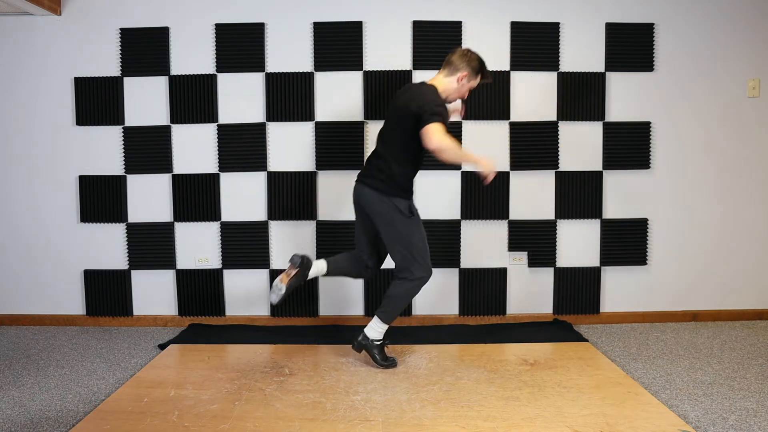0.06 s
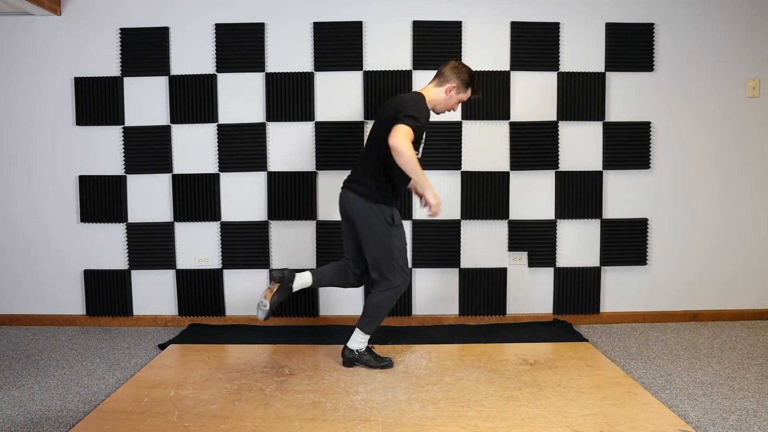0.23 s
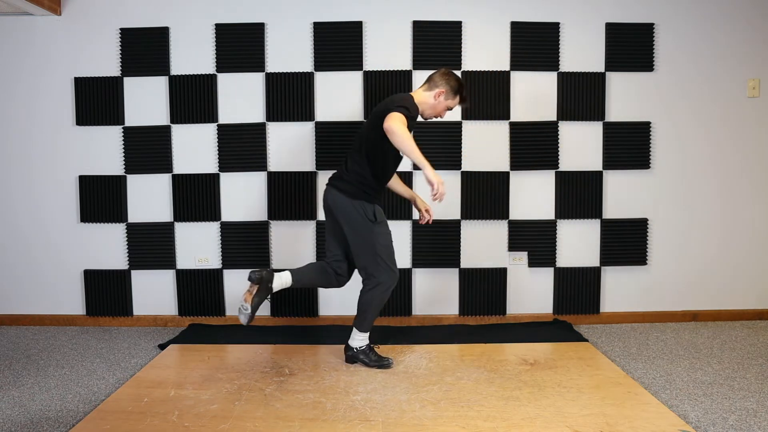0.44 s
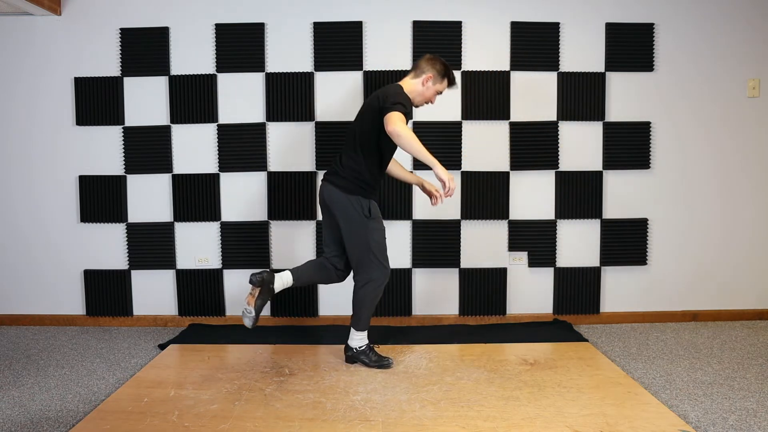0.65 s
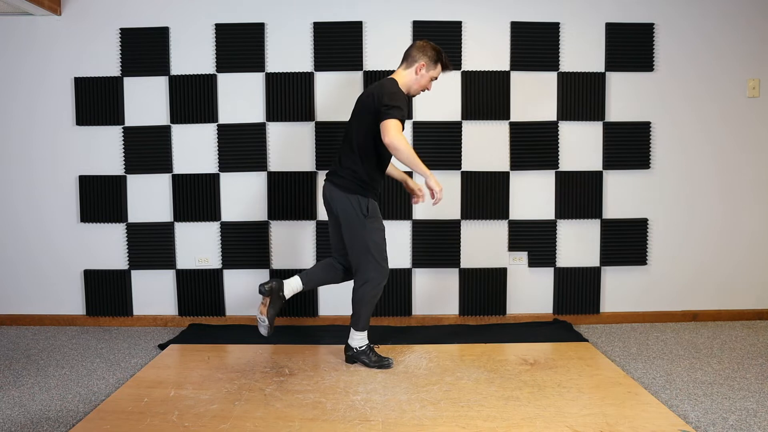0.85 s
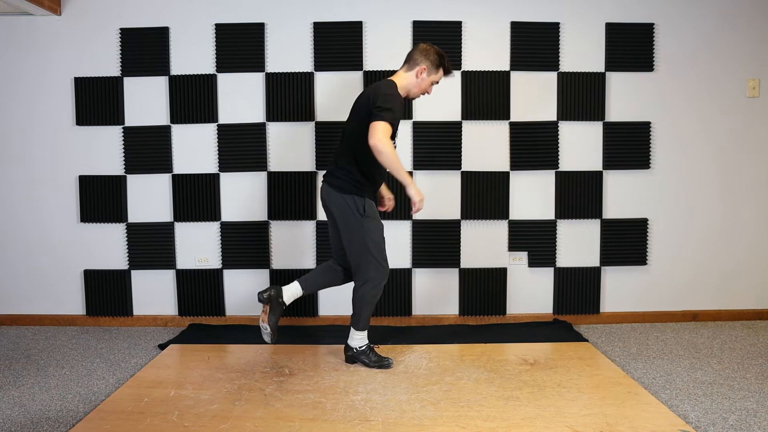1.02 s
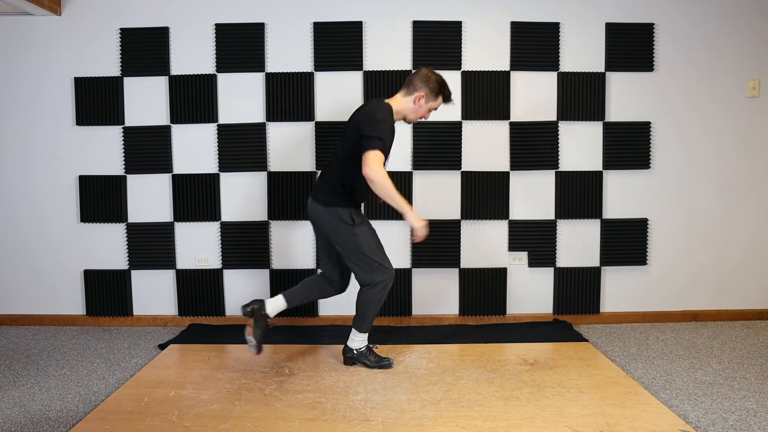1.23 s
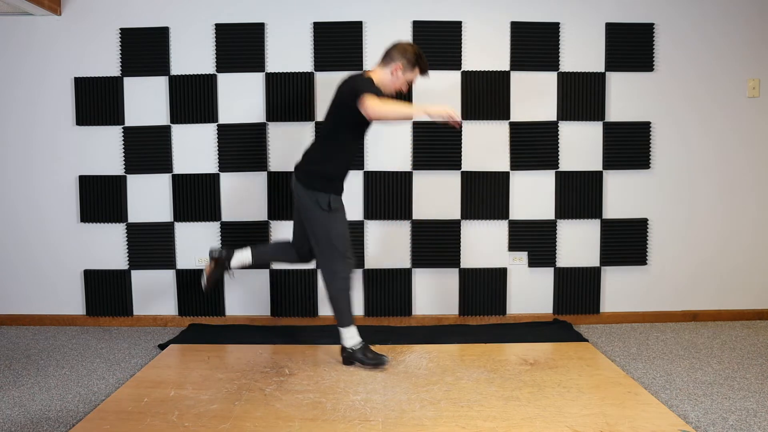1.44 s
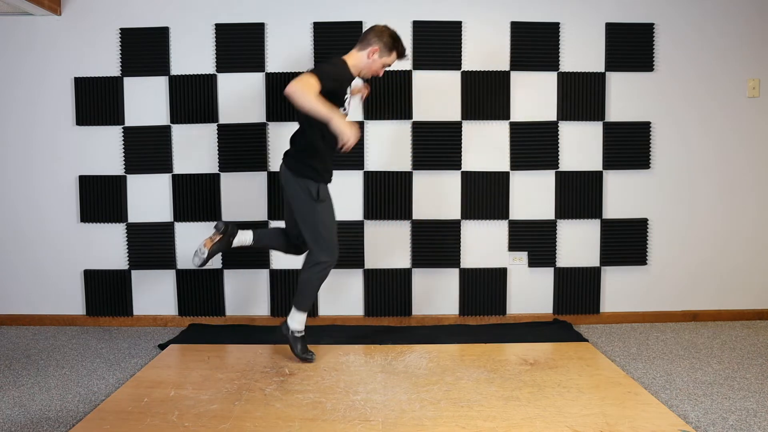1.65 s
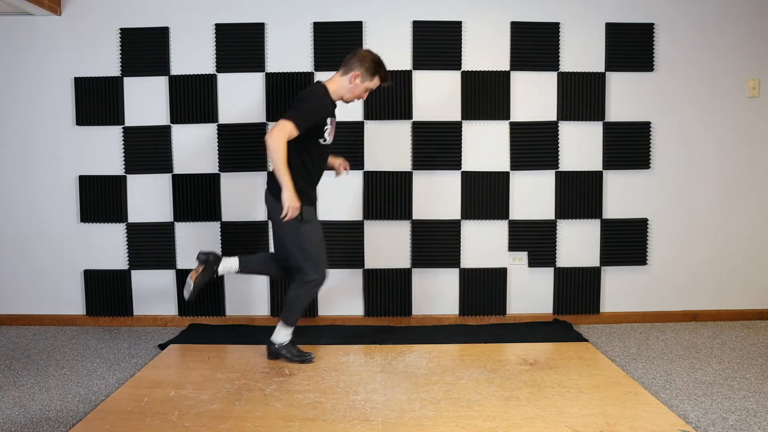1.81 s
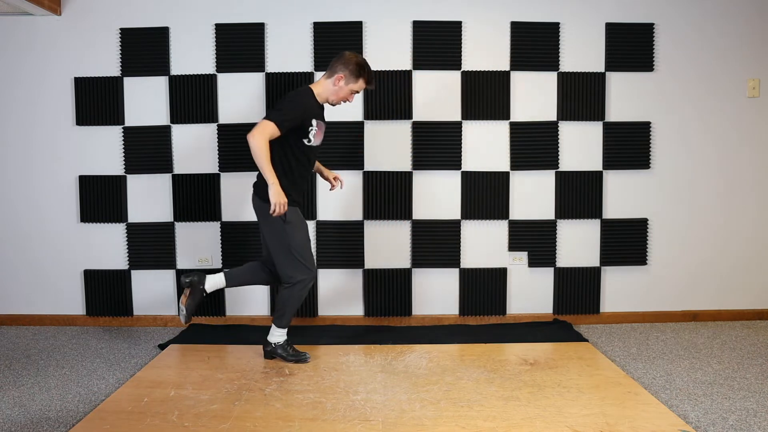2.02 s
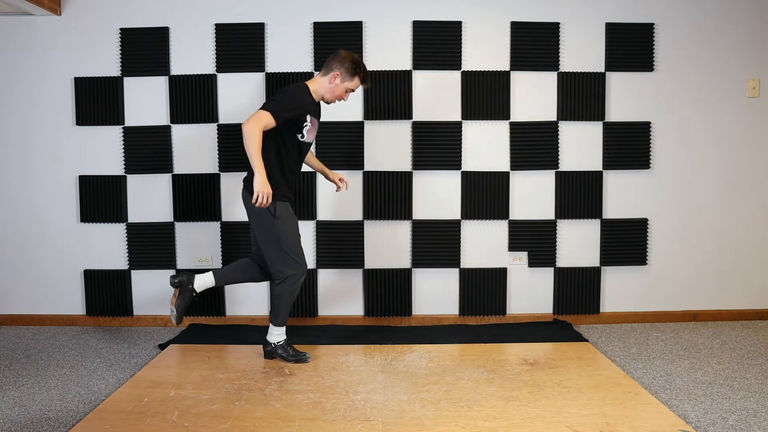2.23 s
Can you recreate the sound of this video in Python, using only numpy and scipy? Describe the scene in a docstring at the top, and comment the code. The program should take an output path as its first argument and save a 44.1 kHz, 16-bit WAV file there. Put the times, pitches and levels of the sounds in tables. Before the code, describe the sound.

Hard dance shoe taps on a wooden floor panel: two, a pause, then three quick ones

```python
"""A small room with a wooden floor panel: hard dance shoes strike two taps, pause, then three quick taps.
In the pause come light clicks, a faint swivel of the sole, a rustle of trouser legs and soft steps.
Noise bursts make the cracks and knocks, damped modes the ring of the shoe tip and the boom of the panel.
Rubbing is a dense train of random slips; wall echoes and diffuse tails make the room, over a low room tone.
The loudest attacks overload the microphone."""
import sys
import numpy as np
from scipy import signal
from scipy.fft import rfft, irfft, next_fast_len
from scipy.io import wavfile
from scipy.ndimage import uniform_filter1d

SR = 44100
rng = np.random.default_rng(int(sys.argv[2]) if len(sys.argv) > 2 else 0)


def wrap_up_sound(samples):
    """Save the sound to the file named by the first command line argument, as 16-bit audio."""
    columns = np.atleast_2d(samples).T
    # keep every value between -1 and 1, then stretch to whole-number steps
    tamed = np.clip(columns, -1, 1)
    steps = np.round(tamed * 32767).astype(np.int16)
    wavfile.write(sys.argv[1], SR, steps)


N = 100503  # samples in the scene

# Levels in the tables are relative; the gains of the layers add to them.
# Steady hush of the room, spectrum [f/Hz, level/dB]
ROOM_TONE_SPECTRUM = [(20, -21), (55, -15), (95, -3), (125, 5), (170, -8.5), (260, -11.5), (450, -22.5),
                      (1000, -26), (3000, -32.5), (7000, -37.5), (11000, -42), (15000, -61)]
# Hard taps [t/s, level/dB, tip pitch favoured by the contact spot f/Hz, crack level/dB, edge level/dB,
# panel boom level/dB, favoured panel pitch f/Hz, wall echo level/dB, room level/dB]
TAP_EVENTS = [(-.005, -5, 1476, 1.5, 1.5, -6.5, 208.3, 0.5, 1.5),
              (0.2228, 5.5, 1440, -4, 0.5, -2.5, 157.7, -1, -3),
              (1.549, 2, 1296, 0, 3.5, -13.5, 200, -7.5, -1.5),
              (1.699, 1.5, 1870, -3, 4, -14, 200, -1.5, -3),
              (1.8748, 6.5, 1312, -6, -1, -11.5, 136, 1, -4.5)]
# First hard contact, spectrum [f/Hz, level/dB]
TICK_SPECTRUM = [(500, -24), (2500, 0), (4500, 8), (6500, -23), (10000, -10.5), (15000, -17.5)]
# Crack of the impact, spectrum [f/Hz, level/dB] and decay [f/Hz, t60/s]
CRACK_SPECTRUM = [(30, -33), (150, -7.5), (400, -4.5), (750, -8), (1400, 10), (2000, 6.5), (3200, -0.5),
                  (5000, -16), (8000, -25.5), (15000, -43)]
CRACK_DECAY = [(100, 0.082), (1500, 0.01), (5000, 0.041), (14000, 0.011)]
# Modes of the shoe tip on wood, then of the floor panel [f/Hz, level/dB, t60/s]
TIP_MODES = [(952, -16.5, 0.04), (1009.7, -17.5, .05), (1326, -4, 0.026), (1482, -9.5, 0.0093),
             (1556, -3.5, 0.033), (1818, -6, .028), (2030, -10, 0.044), (2685, -9, .016), (3320, -12, .015),
             (4680, -19.5, 0.011)]
PANEL_MODES = [(68, -26, .15), (97.5, -26, 0.33), (138.4, -8.5, 0.24), (156, -23, 0.25),
               (203.2, -17.5, 0.42), (235, -22.5, 0.37), (313, -21, 0.2), (448, -20.5, 0.32)]
# Change of treble when the tip lands on its edge [f/Hz, share of the edge level in dB]
EDGE_TILT = [(1800, 0), (3000, -0.57), (4600, 1.5), (7000, 0.36), (14000, .3)]
# Early reflections from near walls [delay t/s, level/dB]
WALL_ECHOES = [(.0031, -11.5), (.0052, -20.5), (.0087, -11.5)]
# Reverberation of the room: decay [f/Hz, t60/s] and colour [f/Hz, level/dB]
ROOM_DECAY = [(100, 0.28), (250, 0.82), (600, 0.43), (1400, 0.47), (3100, 0.5), (5000, 0.52), (7000, 0.42),
              (12000, 0.15)]
ROOM_SPECTRUM = [(40, -7), (150, 1), (600, 3), (1400, 0.5), (2100, -3), (3100, 0), (4200, -5.5), (6000, -4),
                 (14000, -9)]
# Light clicks of the shoe [t/s, level/dB] and their spectrum [f/Hz, level/dB]
CLICK_EVENTS = [(0.886, -55.5), (1.073, -53), (1.484, -54.5)]
CLICK_SPECTRUM = [(200, -5.5), (1200, 8), (2500, -8), (5000, 1.5), (7500, -14.5), (11500, -2.5),
                  (15000, -18.5)]
# Rustle of the trouser legs, envelope [t/s, level/dB] and spectrum [f/Hz, level/dB]
RUSTLE_ENVELOPE = [(1.0, -107), (1.1, -73), (1.25, -72.5), (1.33, -66.5), (1.42, -66.5), (1.5, -61.5),
                   (1.6, -87.5)]
CLOTH_SPECTRUM = [(300, -13), (1300, 0.5), (2500, -4), (4200, -5), (7000, -11.5), (12000, -17),
                  (15000, -36.5)]
# The sole turning on the wood, envelope [t/s, level/dB] and spectrum [f/Hz, level/dB]
SWIVEL_ENVELOPE = [(1.02, -89), (1.065, -67.5), (1.085, -57.5), (1.125, -49.5), (1.18, -52.5),
                   (1.22, -63.5), (1.29, -87.5), (1.4, -96)]
SOLE_SPECTRUM = [(100, -15), (700, -13), (1150, -6), (1600, 0), (2100, -7), (2700, -17), (5000, -25),
                 (8000, -40), (14000, -33.5)]
# Soft footfalls [t/s, sole knock level/dB, panel boom level/dB, tip ring level/dB]
STEP_EVENTS = [(1.199, -48, -38.5, -49), (1.319, -36.5, -30, -37.5), (1.366, -20.5, -18.5, -40.5),
               (1.46, -41, -48.5, -37.5), (1.512, -34.5, -26, -25)]
# Knock of the sole, spectrum [f/Hz, level/dB] and decay [f/Hz, t60/s]
KNOCK_SPECTRUM = [(40, -18), (200, 12.5), (450, -9), (850, -7.5), (1600, -8), (2600, -20), (5000, -22),
                  (8000, -41.5), (12000, -38), (15000, -53.5)]
KNOCK_DECAY = [(100, 0.033), (1500, 0.049), (12000, 0.031)]

# Attack and rise times are time constants of an exponential approach.
ROOM_TONE_DB = -62
TICK_DB, TICK_T60_S, TICK_ATTACK_S = -23.5, 0.0044, 0.0001
CRACK_DB, CRACK_ATTACK_S = -7.5, 0.00026
RING_DB, RING_ATTACK_S = -7.5, 0.00046
BOOM_DB, BOOM_RISE_S = -14.5, 0.012
SPOT_DB, SPOT_OCTAVES = 7, 0.16  # lift and width of the favoured pitch
MODE_SCATTER_DB = 0.73  # standard deviation of each mode's level
PUSH_DB, PUSH_S = -19, 0.0018  # level and time scale of the shove on the panel
TAIL_DB, SCATTER_DB, SCATTER_T60_S, ROOM_BUILD_S = -9, -1.5, 0.19, 0.0018
BOOM_ROOM_BUILD_S, BOOM_ROOM_DB = 0.036, -0.5  # boom builds up in the room more slowly than the clack
CLICK_T60_S = 0.01
SLIPS_PER_S = 4000  # mean rate
STEP_KNOCK_DB, STEP_TIP_DB, STEP_BOOM_DB, STEP_ROOM_DB = -6, -1, -11.5, 5.5
KNOCK_ATTACK_S, STEP_TIP_RISE_S, STEP_BOOM_ATTACK_S = 0.0011, 0.0046, 0.0025
STEP_PANEL_HZ = 200  # favoured panel pitch
LOW_CUT_HZ, TOP_HZ = 37, 15850  # band limits of the microphone
OVERLOAD, OVERLOAD_KNEE = 0.9, 6  # limiting amplitude and sharpness of the bend


def amp(db):
    """Decibel definition: amplitude ratio of a level."""
    return 10 ** (np.asarray(db) / 20)


def unit(x):
    """Normalisation: scale a signal to an rms of 1."""
    return x / np.sqrt(np.mean(x ** 2) + 1e-20)


def along(points, hz):
    """Interpolation on a logarithmic frequency axis through (f/Hz, value) points."""
    f, values = np.transpose(points)
    return np.interp(np.log(hz + 1), np.log(f + 1), values)


def filtered(x, response):
    """Linear filtering: multiply the spectrum by a real response of frequency."""
    size = next_fast_len(len(x) + SR // 2)
    hz = np.fft.rfftfreq(size, 1 / SR)
    return irfft(rfft(x, size) * response(hz), size)[:len(x)]


def coloured(x, spectrum):
    """Spectral shaping: give a signal a spectrum, at rms 1."""
    return unit(filtered(x, lambda hz: amp(along(spectrum, hz))))


def add(track, start_s, sound):
    """Superposition: mix a sound into the track, cutting what falls outside it."""
    i = round(start_s * SR)
    sound = sound[max(-i, 0):N - i]
    track[max(i, 0):][:len(sound)] += sound


def room_tone():
    """Stationary noise: random samples shaped to the spectrum of the hush."""
    return amp(ROOM_TONE_DB) * coloured(rng.standard_normal(N), ROOM_TONE_SPECTRUM)


def burst(spectrum, t60s, attack_s, drive=1, count=12):
    """Frequency-dependent damping: one second of noise dies band by band; drive is a gain per Hz."""
    t, hz = np.arange(SR) / SR, np.arange(SR // 2 + 1)
    shaped = rfft(rng.standard_normal(SR)) * drive * amp(along(spectrum, hz))
    noise = rfft(unit(irfft(shaped, SR)))
    centres = np.geomspace(60, TOP_HZ, count)
    out = np.zeros(SR)
    for centre in centres:
        # 1 at this centre and 0 at the others: overlapping triangular bands
        band_gain = along(np.c_[centres, centres == centre], hz)
        out += irfft(noise * band_gain, SR) * amp(-60 * t / along(t60s, centre))
    return out * (1 - np.exp(-t / attack_s))


def ring(modes, attack_s, spot_hz=None):
    """Modal superposition: damped sines of alternating sign, louder near the contact spot's pitch."""
    t = np.arange(SR) / SR
    hz, db, t60 = np.transpose(modes)[..., None]
    db = db + MODE_SCATTER_DB * rng.standard_normal(hz.shape)
    if spot_hz:
        octaves_away = np.log2(hz / spot_hz)
        db = db + SPOT_DB * np.exp(-0.5 * (octaves_away / SPOT_OCTAVES) ** 2)
    partials = amp(db - 60 * t / t60) * np.sin(2 * np.pi * hz * t)
    signs = (-1) ** np.arange(len(hz))
    return signs @ partials * (1 - np.exp(-t / attack_s))


def push():
    """Impulsive loading: the weight's first low shove on the panel, with no ring."""
    u = np.arange(SR) / SR / PUSH_S
    return amp(PUSH_DB) * u * (2 - u) * np.exp(-u)


def in_room(x, room_db, build_s, size, walls_db=0):
    """Reflection and reverberation: a one-second hit gains wall echoes, a quick scatter and a diffuse tail."""
    # the room answers in the hit's own colour, blurred over size Hz
    power = uniform_filter1d(np.abs(rfft(x)) ** 2, size)
    drive = np.sqrt(np.abs(power))
    tail = burst(ROOM_SPECTRUM, ROOM_DECAY, build_s, drive, count=16)
    scatter = burst(ROOM_SPECTRUM, [(1000, SCATTER_T60_S)], build_s, drive, count=2)
    diffuse = amp(TAIL_DB) * unit(tail) + amp(SCATTER_DB) * unit(scatter)
    echoes = np.zeros(SR)
    for delay_s, db in WALL_ECHOES:
        delayed = np.pad(x, (round(delay_s * SR), 0))[:SR]
        echoes += amp(db + walls_db) * delayed
    return x + echoes + x.std() * amp(room_db) * diffuse


def taps():
    """Impact excitation: the hard tip gives tick, crack and ring; the panel gives shove and boom."""
    out = np.zeros(N)
    for start_s, db, tip_hz, crack_db, edge_db, boom_db, panel_hz, walls_db, room_db in TAP_EVENTS:
        tick = amp(TICK_DB) * burst(TICK_SPECTRUM, [(1000, TICK_T60_S)], TICK_ATTACK_S)
        crack = amp(CRACK_DB + crack_db) * burst(CRACK_SPECTRUM, CRACK_DECAY, CRACK_ATTACK_S)
        tip = amp(RING_DB) * ring(TIP_MODES, RING_ATTACK_S, tip_hz)
        clack = filtered(tick + crack + tip, lambda hz: amp(edge_db * along(EDGE_TILT, hz)))
        boom = amp(BOOM_DB) * ring(PANEL_MODES, BOOM_RISE_S, panel_hz)
        shoe = in_room(clack, room_db, ROOM_BUILD_S, size=560, walls_db=walls_db)
        panel = push() + in_room(boom, BOOM_ROOM_DB, BOOM_ROOM_BUILD_S, size=70)
        add(out, start_s, amp(db) * (shoe + amp(boom_db) * panel))
    return out


def clicks():
    """Brief contact: the shoe ticks lightly as the foot adjusts, each a short noise burst."""
    out = np.zeros(N)
    for start_s, db in CLICK_EVENTS:
        click = burst(CLICK_SPECTRUM, [(1000, CLICK_T60_S)], CRACK_ATTACK_S)
        add(out, start_s, amp(db) * in_room(click, 0, ROOM_BUILD_S, size=260))
    return out


def rub(envelope, spectrum):
    """Sliding friction: dense tiny random slips, shaped in spectrum, under one stroke's envelope."""
    t = np.arange(N) / SR
    level_db = np.interp(t, *np.transpose(envelope), left=-120, right=-120)
    slips = (rng.random(N) < SLIPS_PER_S / SR) * rng.standard_normal(N)
    return amp(level_db) * coloured(slips, spectrum)


def rustle():
    """Friction of cloth on cloth: the trouser legs rub."""
    return rub(RUSTLE_ENVELOPE, CLOTH_SPECTRUM)


def swivel():
    """Friction of sole on wood: the foot turns."""
    return rub(SWIVEL_ENVELOPE, SOLE_SPECTRUM)


def steps():
    """Soft impact: weight shifts and light landings, mostly the sole's knock and the panel's modes."""
    out = np.zeros(N)
    for start_s, knock_db, boom_db, tip_db in STEP_EVENTS:
        knock = amp(knock_db + STEP_KNOCK_DB) * burst(KNOCK_SPECTRUM, KNOCK_DECAY, KNOCK_ATTACK_S)
        tip = amp(tip_db + STEP_TIP_DB) * ring(TIP_MODES, STEP_TIP_RISE_S)
        boom = amp(boom_db + STEP_BOOM_DB) * ring(PANEL_MODES, STEP_BOOM_ATTACK_S, STEP_PANEL_HZ)
        shoe = in_room(knock + tip, 0, ROOM_BUILD_S, size=200)
        panel = in_room(boom, STEP_ROOM_DB, BOOM_ROOM_BUILD_S, size=40)
        add(out, start_s, shoe + panel)
    return out


def scene():
    """Superposition of the footwork and the room tone."""
    return room_tone() + taps() + clicks() + rustle() + swivel() + steps()


def record(dry):
    """Band limiting and saturation: the microphone drops deep bass, rounds high peaks and cuts the top."""
    low_cut = signal.butter(2, LOW_CUT_HZ, "highpass", fs=SR, output="sos")
    x = signal.sosfilt(low_cut, dry)
    rounded = x / (1 + np.abs(x / OVERLOAD) ** OVERLOAD_KNEE) ** (1 / OVERLOAD_KNEE)
    return filtered(rounded, lambda hz: hz < TOP_HZ)


dry = scene()
out = record(dry)
wrap_up_sound(out)
```